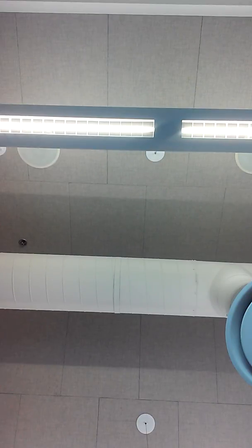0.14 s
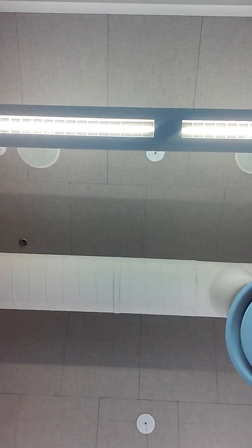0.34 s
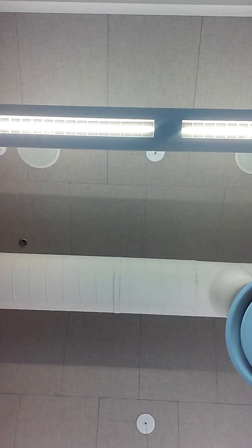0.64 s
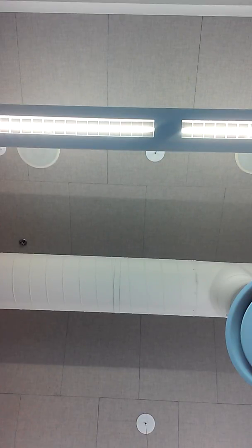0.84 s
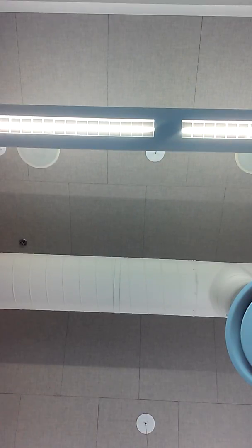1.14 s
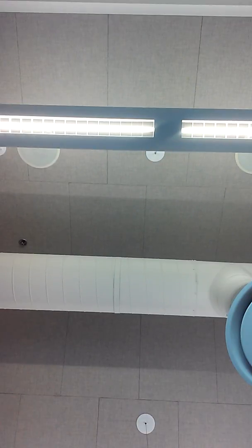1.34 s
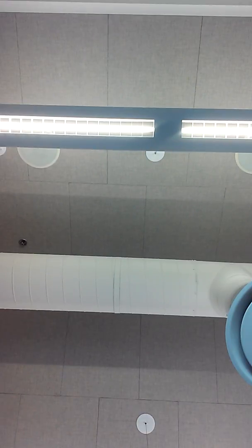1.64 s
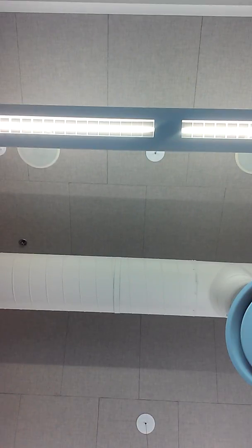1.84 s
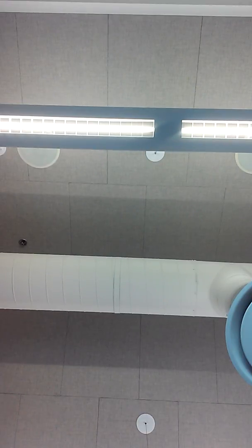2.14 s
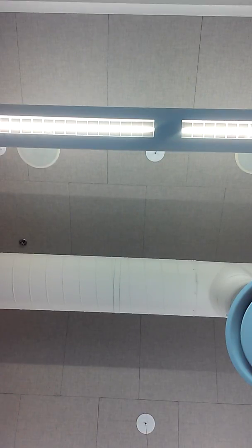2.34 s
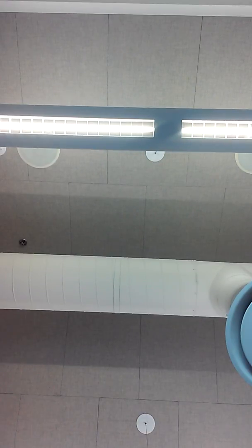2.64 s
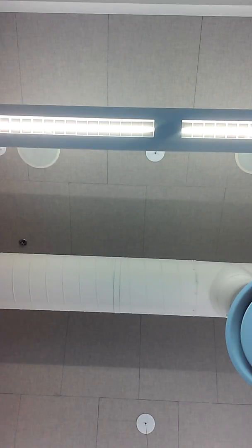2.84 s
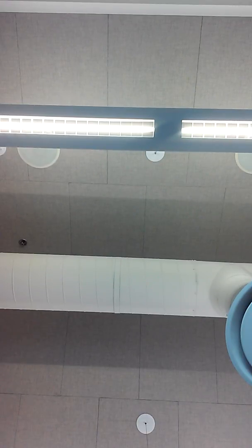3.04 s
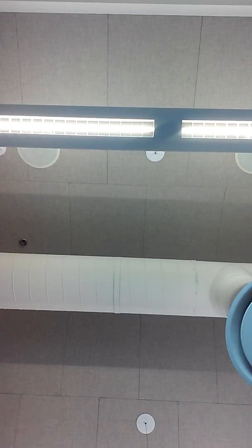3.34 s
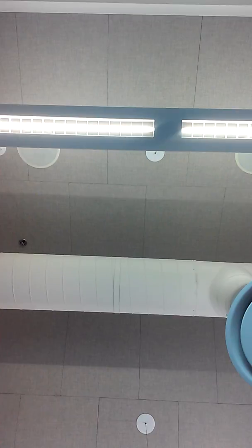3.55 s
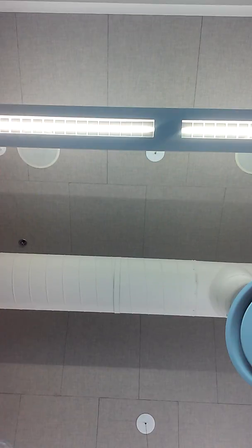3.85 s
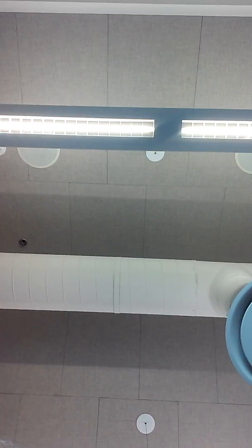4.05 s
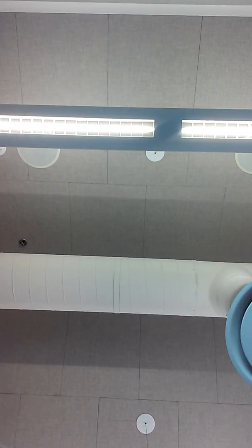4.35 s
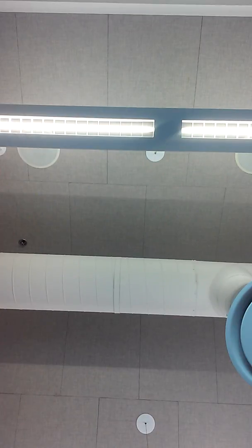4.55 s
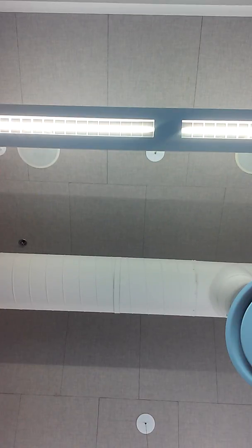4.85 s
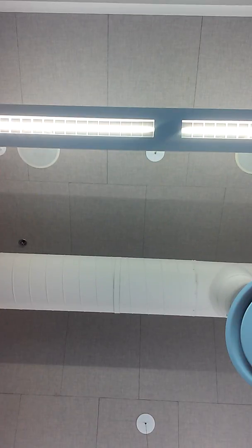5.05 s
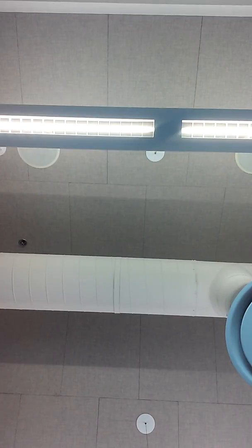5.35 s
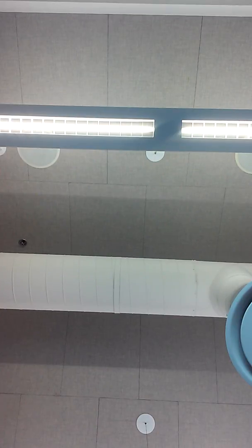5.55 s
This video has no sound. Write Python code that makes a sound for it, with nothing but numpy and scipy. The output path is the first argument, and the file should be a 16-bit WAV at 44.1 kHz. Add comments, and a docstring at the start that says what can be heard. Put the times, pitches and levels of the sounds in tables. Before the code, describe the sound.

Loose paper sheets rustle and snap close by, then a pile slaps the table, drags loudly past and slides straight in a quiet room.

```python
"""Sheets of paper rustle and snap in the hands, close by, over a table in a quiet, ventilated room.
They rub, flex and hiss as noise with sharp grains in it; creases and edges snap as pushes that ring.
One pile slaps the table by the microphone, is dragged close past it, booming in its folds, and slid straight.
The table top murmurs and knocks as low noise and decaying tones; a faint narrow whine comes late.
The phone on the table stores the sound in coarse steps, so the still room becomes a faint two-level buzz."""
import sys
import numpy as np
from scipy import signal
from scipy.fft import rfft, irfft, next_fast_len
from scipy.io import wavfile
from scipy.ndimage import uniform_filter1d, map_coordinates

SR = 44100
rng = np.random.default_rng(int(sys.argv[2]) if len(sys.argv) > 2 else 0)


def transcribe(signal):
    """Save signal, clipped to [-1, 1], as a 16-bit WAV file at the path in sys.argv[1]."""
    frames = np.atleast_2d(signal).T
    limited = np.clip(frames, -1, 1)
    pcm = np.round(limited * 32767).astype(np.int16)
    wavfile.write(sys.argv[1], SR, pcm)


def boost(x):
    """Linear amplitude factor 10**(x/20) for a level x in decibels (scalar or array-like)."""
    u = np.asarray(x, float) / 20
    return 10 ** u


N = 251811

# Loose sheets shaken and rubbed close by:
# peak t/s, rubbing level/dB, rise through 20 dB/s, fall through 20 dB/s, flexing over rubbing/dB
SHAKEN_SHEETS = [(.044, -57.5, .3, 0.15, -0.5), (0.305, -40.5, .07, 0.15, -4.5),
                 (0.452, -43.5, .07, 0.088, -2.5), (.53, -53, .12, 0.25, -2.5),
                 (0.603, -42, .02, 0.13, -10), (.65, -52.5, .08, 0.052, 2.5), (.67, -52.5, .01, 0.18, 3),
                 (.77, -54, .03, 0.35, 2), (0.827, -50, .02, 0.11, -3), (.89, -52.5, .1, 0.063, -5.5),
                 (.918, -48.5, .01, 0.053, -1), (.975, -65, .1, 0.1, 9.5), (1.059, -54.5, 0.026, .035, 1.5),
                 (1.11, -54.5, .012, .06, -0.5), (1.141, -51, .04, 0.027, -8.5),
                 (1.175, -45, 0.031, 0.052, -8.5), (1.21, -58, .05, 0.47, 1.5),
                 (1.343, -61, .08, .06, -4.5), (1.38, -55.5, .03, 0.039, 8.5),
                 (1.405, -48, .012, 0.089, -5.5), (1.46, -59.5, .1, .2, 7), (1.523, -41.5, .05, .11, -6),
                 (1.6, -62.5, .1, 0.36, 2.5), (1.777, -60, .012, 0.058, 3.5), (1.82, -71, .05, 0.12, 7.5),
                 (2.118, -71.5, .006, 0.11, 15), (2.252, -64.5, .035, 0.15, 3),
                 (2.275, -66, 0.026, 0.3, 5.5), (2.46, -62.5, .3, 0.059, -6.5),
                 (2.661, -68.5, .03, 0.072, -0.5), (2.77, -77, .08, 0.14, -5),
                 (3.273, -51.5, .008, 0.11, 1), (3.324, -55.5, 0.058, 0.1, 9),
                 (3.456, -45.5, .025, .035, -2.5), (3.49, -51.5, .05, 0.053, 7),
                 (3.518, -44.5, .05, 0.047, 11.5), (3.548, -50, 0.036, 0.037, 5), (4.58, -73, .3, 0.23, 5),
                 (4.705, -65.5, .008, .03, 2.5), (4.74, -67.5, .006, 0.097, 3.5),
                 (4.93, -79, 0.085, .4, -9)]


def unit(x):
    """Scaled to rms 1."""
    return x / np.sqrt(np.mean(x ** 2) + 1e-20)


def along(points, hz):
    """Points of (Hz, value), read on a log frequency axis."""
    f, value = np.transpose(points)
    return np.interp(np.log(hz + 1), np.log(f + 1), value)


def curves(rows):
    """One value per sample for each column after the time; the level (first column) is silent beyond both ends."""
    s, level, *columns = np.transpose(rows)
    t = np.arange(N) / SR
    sounding = (t > s[0] - .013) & (t < s[-1] + .013)
    level_db = np.where(sounding, np.interp(t, s, level), -120)
    return [level_db] + [np.interp(t, s, column) for column in columns]


def swells(rows, extra_db=0):
    """Rows that rise to a peak and fall away, straight in dB, added as power."""
    s, db, rise, fall = np.transpose(rows)[:4, :, None]
    t = np.arange(0, N / SR, .001)
    late = t - s
    drop_db = 20 * np.where(late < 0, -late / abs(rise), late / abs(fall))
    power = boost(db + extra_db - drop_db) ** 2
    total_db = 10 * np.log10(power.sum(axis=0) + 1e-12)
    return np.interp(np.arange(N) / SR, t, total_db)


def wobble(rate):
    """A smooth random curve, rate knots a second."""
    knots = rng.standard_normal(N // 50)
    return map_coordinates(knots, [np.arange(N) * rate / SR])


def filtered(x, response):
    """x through a complex response of frequency, padded so that its end does not wrap to the start."""
    n = x.shape[-1]
    padded = next_fast_len(n + min(8192, n // 2))
    spectrum = rfft(x, padded) * response(np.fft.rfftfreq(padded, 1 / SR))
    return irfft(spectrum, padded)[..., :n]


def coloured(x, spectrum):
    """x through a spectrum of (Hz, dB) points, at rms 1."""
    return unit(filtered(x, lambda f: boost(along(spectrum, f))))


def mode(f, hz, width_hz):
    """A causal resonance."""
    return 1j * f * width_hz / (hz * hz - f * f + 1j * f * width_hz)


def bell(f, hz, octaves):
    """A smooth hump on the octave axis, with steep flanks."""
    return np.exp(-.5 * (np.log2((f + 1) / hz) / octaves) ** 2)


def friction(clumps, slips, size_db, patchy_db, inward=0.49):
    """Fibres catch and let go: sharp grains of unequal size over a smooth rub, ringing in short-lived folds."""
    # slips = grains per second, inward = share of grains that pull
    direction = np.sign(rng.random(N) - inward)
    size = boost(size_db * np.minimum(rng.exponential(size=N), 3))
    grains = direction * size * (rng.random(N) < slips / SR)
    smooth_rub = rng.standard_normal(N)
    z = signal.stft(clumps * (smooth_rub + 1.1 * unit(grains)), nperseg=512)[2]
    # random patches, wider in time than in frequency, are the folds
    field = uniform_filter1d(rng.standard_normal(z.shape), size=2, axis=0)
    field = uniform_filter1d(field, size=7, axis=1)
    return signal.istft(z * boost(patchy_db * unit(field)), nperseg=512)[1][:N]


def stroke(levels_db, low, middle, high, clump_db, slips, inward):
    """A stroke comes in clumps that all three layers share; each layer has its own colour and level."""
    clumps = boost(clump_db * (wobble(40) + 0.93 * wobble(150)))
    low_rub = friction(clumps, slips, size_db=1.5, patchy_db=3.0, inward=inward)
    middle_rub = friction(clumps, 1.9 * slips, size_db=0.0, patchy_db=3.0, inward=inward)
    high_rub = friction(clumps, 4 * slips, size_db=3.0, patchy_db=3.5)
    layers = [coloured(low_rub, low), coloured(middle_rub, middle), coloured(high_rub, high)]
    # levels are smoothed over 100 samples: nothing starts or stops faster than a few milliseconds
    return sum(uniform_filter1d(boost(db), size=100) * layer for db, layer in zip(levels_db, layers))


def stillness():
    """Ventilation as grainy noise that wavers a little, and a late whine: noise through a narrow resonance."""
    # colour of the ventilation: f/Hz, level/dB
    air_colour = [(20, -30.5), (60, -7.5), (200, -6.5), (450, -6), (650, -4.5), (850, 0.5), (1050, -5),
                  (1300, -7.5), (2500, -18.5), (5000, -31), (15000, -40)]
    # faint narrow whine far off: t/s, level/dB
    whine_rows = [(5.5, -100), (5.54, -79.5), (5.71, -76.5)]
    waver = boost(.7 * wobble(3.9))
    air = coloured(friction(waver, 2500, size_db=1.46, patchy_db=3.0), air_colour)
    whine = filtered(rng.standard_normal(N), lambda f: mode(f, hz=1250, width_hz=40) ** 2)
    return boost(-78) * air + boost(curves(whine_rows)[0]) * unit(whine)


def walls(x):
    """The room answers with a noise tail in which each frequency dies at its own speed."""
    # decay of the small room: f/Hz, t60/s
    decay_rows = [(300, 0.23), (2000, 0.3), (10000, .18)]
    hz, t, z = signal.stft(rng.standard_normal(SR // 2), SR, nperseg=256)
    decay_db = -60 * t / along(decay_rows, hz)[:, None]
    tail = signal.istft(z * boost(decay_db), SR, nperseg=256)[1]
    delayed = np.pad(x, (300, 0))  # samples before the first answer
    return signal.fftconvolve(delayed, tail / np.linalg.norm(tail))[:N]


def rumble():
    """The table top murmurs under the weight of the hands: low noise of uneven strength."""
    # hands leaning on the table: t/s, rumble level/dB
    weight_rows = [(0, -60), (.2, -72), (.36, -63), (.89, -69), (1.34, -68), (1.385, -59), (1.55, -60),
                   (2.03, -80), (2.41, -71), (2.68, -83), (3.25, -84), (3.3, -62), (3.42, -70), (3.45, -52),
                   (3.52, -56), (3.67, -49), (3.87, -58), (3.98, -49), (4.05, -57.5), (4.32, -61),
                   (4.4, -53), (4.45, -60), (4.75, -72), (4.9, -86), (5.71, -86)]
    # colour of the table top: f/Hz, level/dB
    table_colour = [(15, -29.5), (25, -1), (124, -2), (157, -5), (265, -9), (300, -8), (390, -30.5),
                    (660, -120)]
    uneven = rng.standard_normal(N) * boost(2.5 * wobble(25))
    return boost(curves(weight_rows)[0]) * coloured(uneven, table_colour)


def bumps():
    """Knuckles and pile meet the table, which rings low and short as a decaying sine."""
    # bumps on the table: t/s, level before the soft onset/dB, f/Hz, t60/s
    bump_rows = [(.002, -54, 95, .3), (1.368, -50.5, 94, 0.47), (1.45, -52, 94, .5),
                 (3.281, -56.5, 90, 0.17), (3.44, -43, 240, .07), (3.445, -40.5, 130, 0.24),
                 (3.556, -30, 400, .12), (3.459, -43.5, 120, .25), (3.611, -47, 120, 0.22),
                 (4.37, -43, 70, .25)]
    out, t = np.zeros(N + SR), np.arange(SR // 3) / SR
    for s, db, hz, t60 in bump_rows:
        onset = 1 - np.exp(-t / .004)
        ring = boost(db - 60 * t / t60) * np.sin(2 * np.pi * hz * t)
        out[round(s * SR):][:len(t)] += ring * onset
    return out[:N]


def scrapes():
    """An edge catches hard: noise bands as narrow squeaks and hollow rubs, or short bright tearing bursts."""
    # catching edges: t/s, length/s, level before the swell/dB, f/Hz, width/octaves
    scrape_rows = [(3.924, .045, -30, 2520, .7), (3.926, .035, -30, 2280, 0.086),
                   (3.926, 0.045, -37.5, 4476, 0.08), (1.772, .006, -48.5, 5000, 1.1),
                   (1.923, .006, -66, 5000, .3), (2.113, .03, -60, 1000, .4), (2.443, .006, -58, 2800, .25),
                   (3.97, .009, -21.5, 2500, 0.84), (3.981, .007, -29, 3520, 0.65),
                   (3.982, 0.018, -30.5, 870, 0.069), (3.922, .06, -31.5, 567, 0.26),
                   (3.812, 0.037, -27, 940, .1), (4.58, .05, -66, 620, .15), (3.8, .028, -55, 600, .13),
                   (4.699, .015, -66, 3000, .45), (4.73, .07, -63, 520, .15),
                   (.782, 0.0031, -51, 6500, 0.35)]
    t, out = np.arange(SR // 5) / SR, np.zeros(N)
    for s, length, db, hz, octaves in scrape_rows:
        swell = np.sin(np.pi * np.clip(t / length, 0, 1) ** 0.55)
        band = filtered(rng.standard_normal(len(t)), lambda f: bell(f, hz, octaves))
        out[round(s * SR):][:len(t)] += boost(db) * swell * unit(band)
    return out


def slap():
    """The pile's edge strikes the table right by the microphone: one full, dull push."""
    # the strike: t/s, peak level/dB, f/Hz
    s, db, hz = (3.5583, -1, 1550)
    inward = -1. * (np.arange(N) == round(s * SR))
    push = filtered(inward, lambda f: bell(f, hz, 0.52) + 0.068 * bell(f, 4850, 0.13))
    return boost(db) * push / abs(push).max()


def crackles():
    """Small creases: chance rows like those of the snaps, as strong as the sheets are rubbed just then."""
    count, until_s = 130, 3.5
    weakest_db, spread_db = 3, 9  # weakest over the rubbing, range above it
    when, size, pitch, sheen = rng.random((count, 4)).T
    s = when * until_s
    rubbing_db = swells(SHAKEN_SHEETS)[(s * SR).astype(int)]
    db = rubbing_db + weakest_db + spread_db * size
    return list(zip(s, db, 900 * 3.5 ** pitch, -30 + 18 * sheen))


def snaps():
    """Each snap: one sudden inward push, then a dying flutter ringing at the size of its crease; a tick on top."""
    # creases that snap and edges that strike: t/s, peak level of the body/dB, ring f/Hz, treble over body/dB
    snap_rows = [(0.046, -39.5, 3210, -29), (0.257, -34.5, 2770, -14), (0.272, -29.5, 1140, -7.5),
                 (0.416, -28.5, 1880, -35), (0.438, -29.5, 1170, -24.5), (0.587, -30.5, 1330, -13),
                 (0.605, -27.5, 1330, -24), (0.615, -26.5, 1370, -29), (0.667, -28, 896, -31.5),
                 (0.736, -26, 1080, -29), (0.773, -32.5, 1370, -23), (0.828, -32.5, 1460, -23.5),
                 (0.914, -28, 1360, -23), (1.041, -36, 2530, -10), (1.057, -42, 1230, -20.5),
                 (1.104, -33, 2680, -23), (1.163, -33, 2170, -24), (1.181, -35.5, 3130, -23.5),
                 (1.271, -43, 864, -20), (1.335, -43, 729, -23), (1.369, -37.5, 1180, -22.5),
                 (1.402, -30.5, 2110, -29), (1.416, -36, 2190, -24.5), (1.438, -39, 1330, -17.5),
                 (1.502, -31.5, 2950, -22.5), (1.52, -25, 3080, -25.5), (2.243, -49, 1050, -18),
                 (2.263, -32.5, 2450, -37), (2.387, -48.5, 1100, -15.5), (2.456, -41.5, 2430, -18.5),
                 (2.655, -53.5, 1080, -23), (3.268, -37, 867, -16), (3.433, -42, 921, -15.5),
                 (3.443, -36, 982, -13), (3.452, -32.5, 756, -16), (3.479, -22, 657, -27.5),
                 (3.98, -11, 880, -27.5), (4.182, -25, 2420, -20.5), (4.598, -48.5, 600, -19.5),
                 (4.736, -46.5, 598, -32)]
    out, t = np.zeros(N + SR), np.arange(SR // 20) / SR
    push = -1. * (np.arange(len(t)) == 44)  # 1 ms after the row's time
    for s, db, hz, treble_db in [*snap_rows, *crackles()]:
        # the flutter starts 14.5 dB under the push and dies by 60 dB in 26 ms
        dying = boost(-14.5 - 60 * t / 0.026) * (t > .001)
        body_flutter, tick_flutter = dying * rng.standard_normal((2, len(t)))
        blow = filtered(push + .75 * body_flutter, lambda f: bell(f, .55 * hz + 1200, 0.73))
        ring = filtered(body_flutter + .5 * push, lambda f: mode(f, hz, .2 * hz) * bell(f, hz, 0.92))
        tick = filtered(tick_flutter + 0.42 * push, lambda f: bell(f, 7200, 0.33))
        body = blow + 3.1 * ring
        snap = body / abs(body).max() + boost(treble_db) * tick / abs(tick).max()
        out[round(s * SR):][:len(t)] += boost(db) * snap
    return out[:N]


def loose_sheets():
    """Loose sheets in the hands flex low, rub in the middle and hiss high as their edges pass one another."""
    # edges swishing past one another: peak t/s, hiss level/dB, rise through 20 dB/s, fall through 20 dB/s
    swish_rows = [(.27, -51, .07, 0.24), (.578, -50.5, .12, .08), (.9, -54.5, .12, 0.13),
                  (1.048, -53.5, .012, .07), (1.5, -54.5, .15, 0.23), (1.93, -71.5, .06, .04),
                  (2.427, -60, .12, 0.097), (3.275, -59, .008, 0.12), (3.435, -56, .004, 0.31),
                  (4.6, -71.5, .3, .15), (4.95, -82, .1, .3), (5.45, -83.5, .1, .2)]
    # colours of flexing, rubbing and hissing: f/Hz, level/dB
    flex_colour = [(210, -49.5), (350, -11.5), (613, -9), (727, -0.5), (1130, -1.5), (1230, -5.5),
                   (1330, -3.5), (1500, -7), (1950, -38.5), (3300, -120)]
    rub_colour = [(820, -29.5), (1400, -1), (1460, -2), (2130, 0.5), (2350, -5), (3120, -5), (4900, -9.5),
                  (6370, -40.5), (10800, -120)]
    hiss_colour = [(2880, -23.5), (4900, -3), (6030, -5), (7000, 0), (9710, -16.5), (10600, -19),
                   (14900, -29.5), (15500, -33)]
    flex_over_rub_db = np.array(SHAKEN_SHEETS)[:, 4:]
    rub_db = swells(SHAKEN_SHEETS)
    flex_db = swells(SHAKEN_SHEETS, flex_over_rub_db)
    hiss_db = np.maximum(rub_db - 10, swells(swish_rows))  # some hiss comes with any rubbing
    return stroke([flex_db, rub_db, hiss_db], flex_colour, rub_colour, hiss_colour,
                  clump_db=1.1, slips=500, inward=0.61)


def squaring_slide():
    """The smooth slide that squares the pile: fine friction whose bending grows slowly with speed."""
    # the pile slid straight: t/s, speed as rubbing level/dB
    slide_rows = [(4.0, -38.5), (4.062, -38.5), (4.118, -34.5), (4.15, -40.5), (4.208, -33), (4.286, -32.5),
                  (4.358, -38.5), (4.43, -48.5), (4.51, -73.5)]
    # colours of the bending pile, its rubbing and its hissing: f/Hz, level/dB
    bend_colour = [(210, -55), (350, -16), (517, -16.5), (559, -10.5), (754, -13), (872, -4.5), (991, -3.5),
                   (1500, -11), (1950, -25.5), (3300, -120)]
    slide_rub_colour = [(820, -29), (1400, -10), (1770, 1), (2260, -2.5), (2420, -1), (2600, -3.5),
                        (3390, -6), (4000, -20.5), (5200, -36), (8800, -120)]
    slide_hiss_colour = [(2290, -33), (3900, -3), (5030, -0.5), (6330, -12), (6950, -9.5), (7750, -14.5),
                         (8650, -12.5), (11000, -30.5), (12800, -27.5), (15500, -38.5)]
    speed_db, = curves(slide_rows)
    bend_db = np.minimum(-29.5 + 0.46 * speed_db, speed_db + 11.5)
    return stroke([bend_db, speed_db, speed_db - 8.5], bend_colour, slide_rub_colour, slide_hiss_colour,
                  clump_db=-0.6, slips=2800, inward=0.73)


def dragged_pile():
    """The duller pile dragged close past the microphone: every low and middle grain pulls, and its folds boom."""
    # pile dragged close by: t/s, pressure as fold level/dB, brightness/dB
    drag_rows = [(3.572, -24.5, -1), (3.6, -28.5, -4), (3.625, -30.5, 6), (3.65, -25, -4.5),
                 (3.675, -27, 0.5), (3.7, -24.5, 0), (3.735, -26.5, 8), (3.765, -29.5, -3.5),
                 (3.795, -29.5, -2.5), (3.83, -22, -4), (3.877, -29.5, -5.5), (3.905, -34.5, 4.5),
                 (3.939, -34, 14.5), (3.96, -32.5, 8)]
    # colours of the hollow folds, the pile on the table and edge hiss behind the pile: f/Hz, level/dB
    fold_colour = [(180, -65.5), (300, -31.5), (426, -5.5), (511, -16), (596, -3), (750, -10), (860, -3),
                   (1040, -10.5), (1130, 3), (1230, -18), (1340, -1.5), (1500, -11.5), (1950, -41),
                   (3300, -120)]
    pile_colour = [(820, -26), (1400, -9), (1780, 2.5), (1890, -4.5), (2030, 0.5), (2210, -3),
                   (3000, -16.5), (4000, -29.5), (5200, -60.5), (8800, -120)]
    shaded_colour = [(2350, -32.5), (4000, -6), (5080, -3), (6260, -15), (8260, -17), (10000, -27),
                     (15500, -32.5)]
    press_db, bright_db = curves(drag_rows)
    rub_db = press_db - 4 + 0.31 * bright_db
    hiss_db = press_db - 25.5 + bright_db
    return stroke([press_db, rub_db, hiss_db], fold_colour, pile_colour, shaded_colour,
                  clump_db=-0.43, slips=340, inward=1.0)


def scene():
    """Paper near, a little room from the hits alone, still air."""
    hits = snaps() + slap() + scrapes()
    room = boost(-10) * walls(hits)
    paper = loose_sheets() + squaring_slide() + dragged_pile()
    return (stillness() + room + rumble() + bumps() + hits + paper)[None]


def band_limit(x):
    """A steep low-pass at the top of the band."""
    return signal.sosfilt(signal.butter(12, 15700, fs=SR, output="sos"), x)


def record(dry):
    """The phone cuts every sample down to a whole step, which leaves the still air on about two levels."""
    step = .00045  # of full scale
    stepped = step * np.floor(dry / step)
    return band_limit(stepped)


dry = scene()
out = record(dry)
transcribe(out)
```